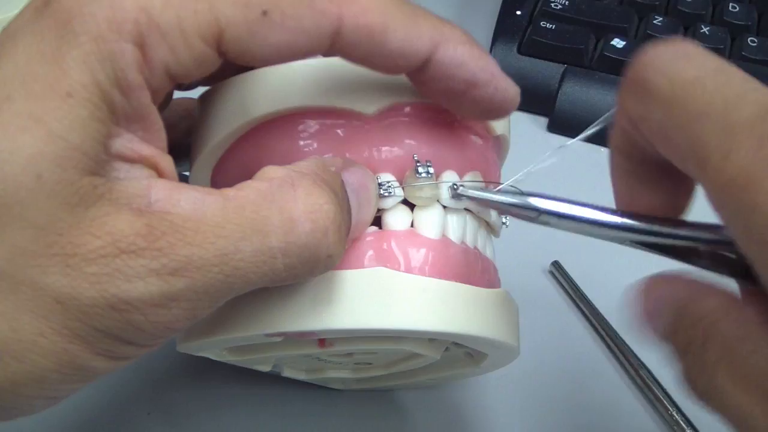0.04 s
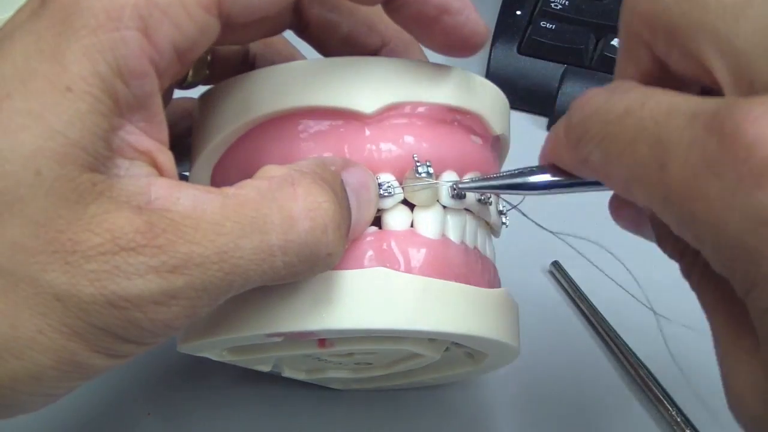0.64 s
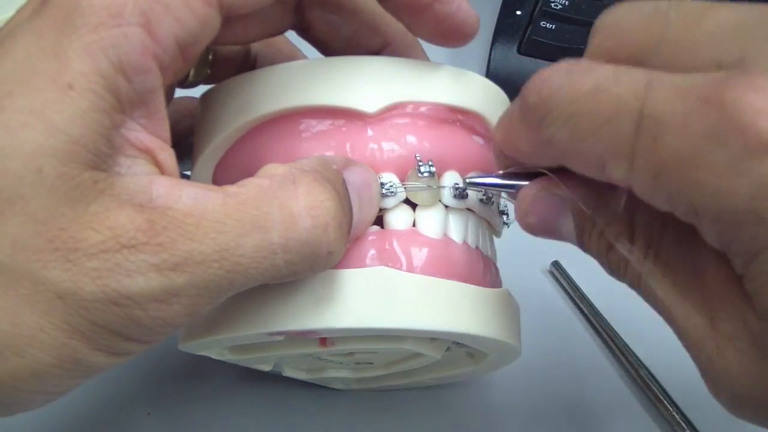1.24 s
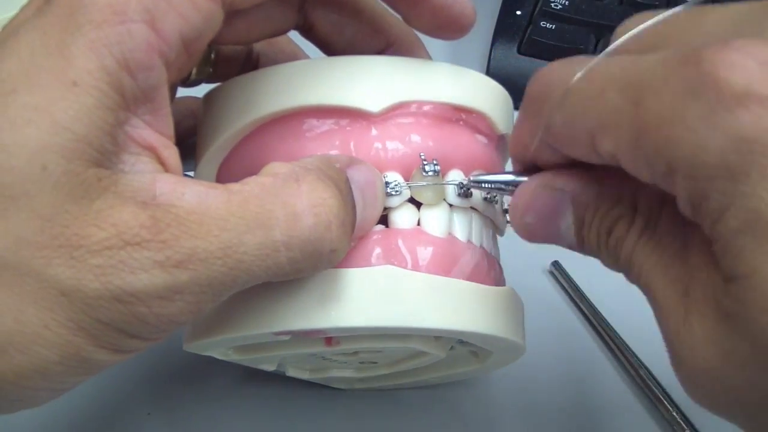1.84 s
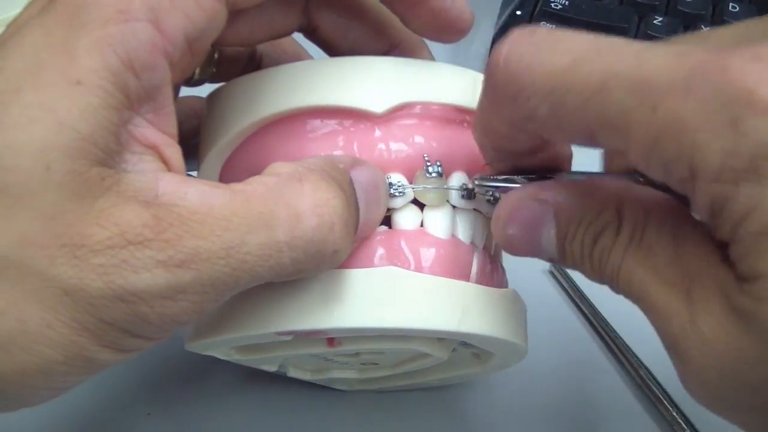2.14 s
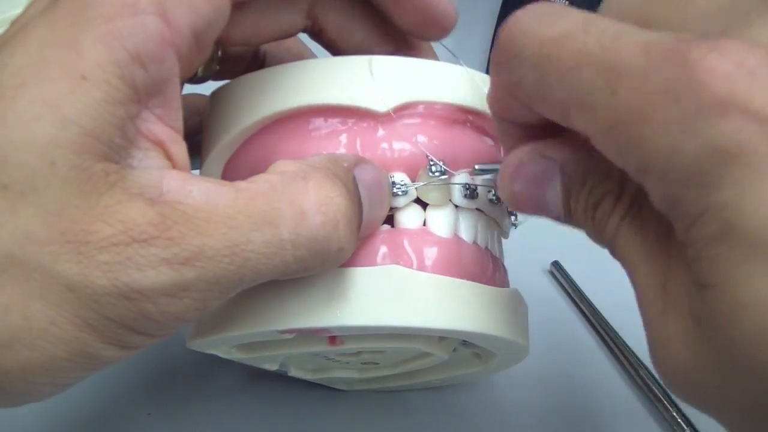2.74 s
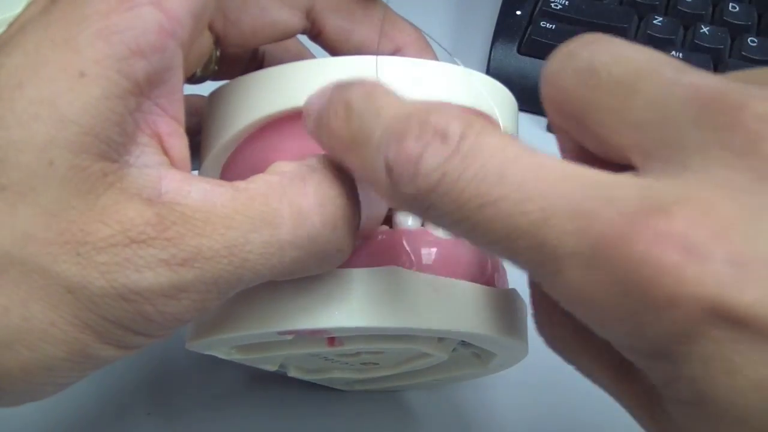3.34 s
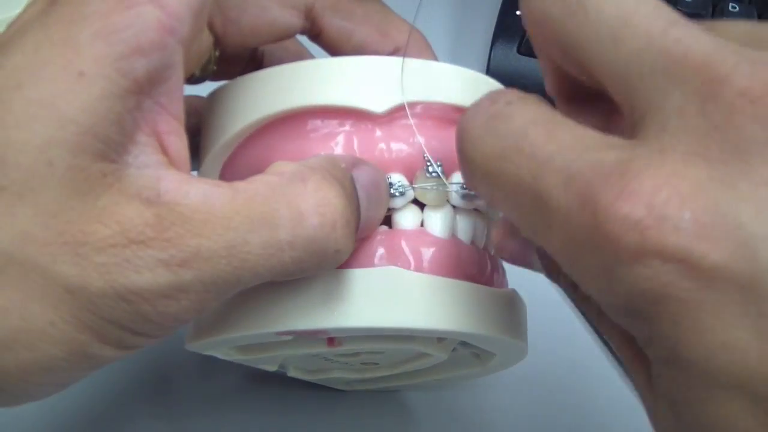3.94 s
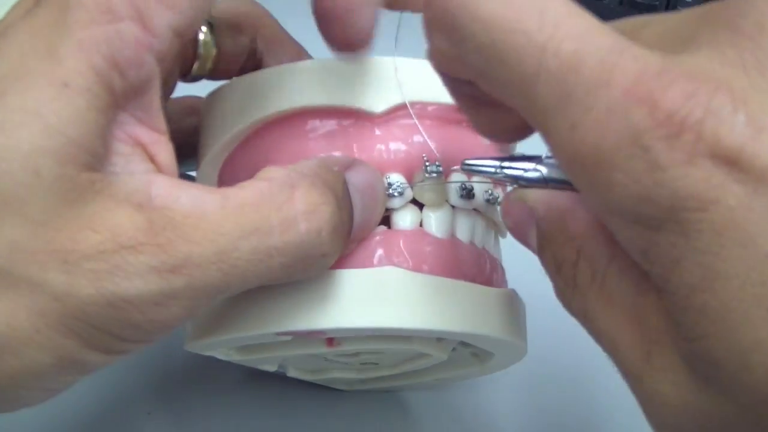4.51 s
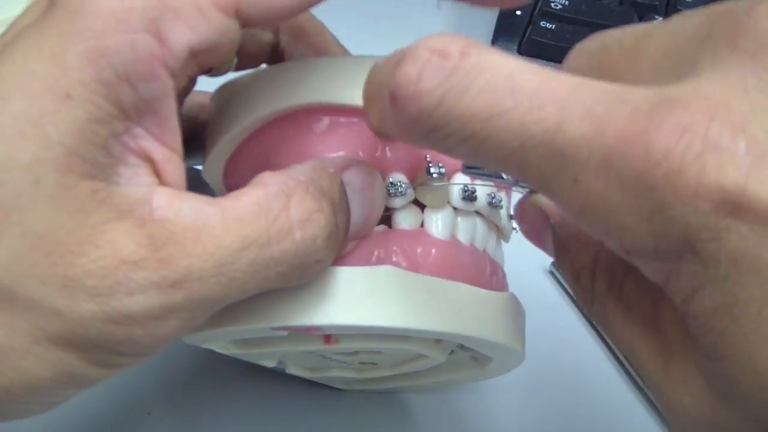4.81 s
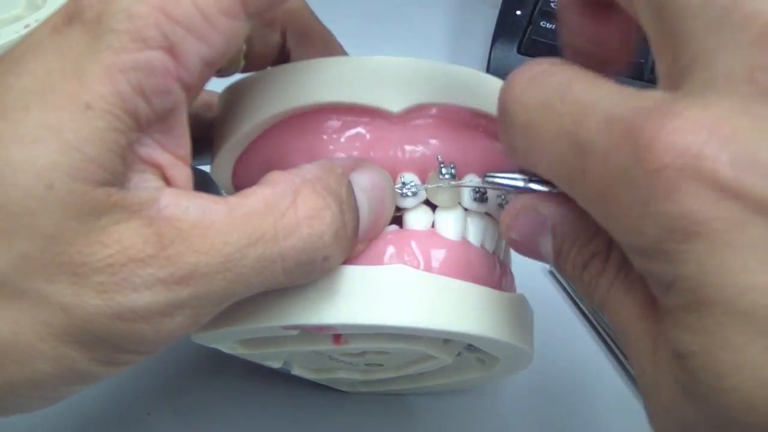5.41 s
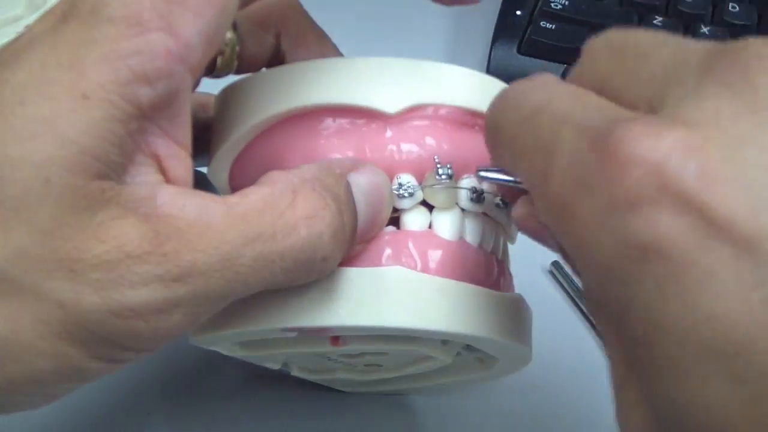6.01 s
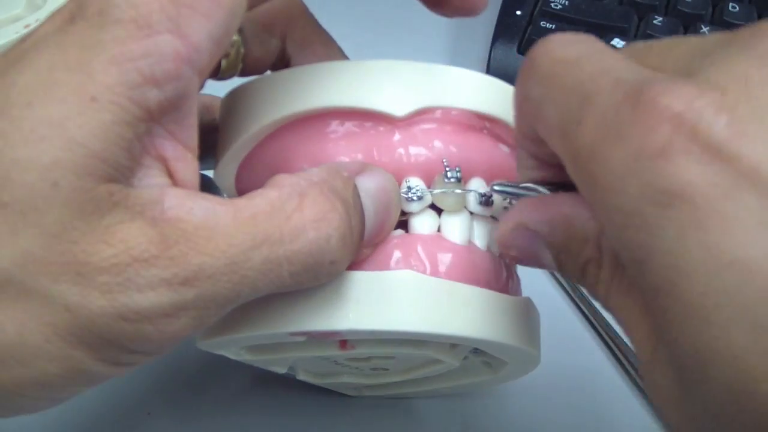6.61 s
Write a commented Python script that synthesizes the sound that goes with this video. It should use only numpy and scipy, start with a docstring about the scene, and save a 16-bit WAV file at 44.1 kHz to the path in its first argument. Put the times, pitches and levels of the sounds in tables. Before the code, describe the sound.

Faint scattered ticks and scrapes of fine wire being tightened onto a dental model's braces, under a room's electrical hum and fan noise.

```python
"""A small office, a camera's stereo microphone close to a plastic dental model; mains hum and fans throughout.
Pliers twist a thin steel ligature wire onto the brackets: it drags in fine stick-slip and rings, loose at first.
After half a second the grip changes and the wire, now tight, snaps over edges and squeaks; the model knocks
now and then. From 3 s the wire is tucked in, with a new ring and sparser strokes, up to a last cluster of snaps."""
import sys
import numpy as np
from scipy import signal
from scipy.fft import rfft, irfft, next_fast_len
from scipy.io import wavfile
from scipy.ndimage import map_coordinates

SR = 44100
rng = np.random.default_rng(int(sys.argv[2]) if len(sys.argv) > 2 else 0)


def output_pcm(signal):
    """Save a mono or channel-first signal as 16-bit PCM at the path in sys.argv[1].

    Samples are clipped to [-1, 1] before scaling.
    """
    pcm = np.clip(np.atleast_2d(signal).T, -1, 1) * 32767
    wavfile.write(sys.argv[1], SR, np.round(pcm).astype(np.int16))


N = 293706
TOP_HZ = 15900  # the microphone's band limit


def amp(db):
    """Decibels to gain."""
    return 10 ** (np.asarray(db) / 20)


def unit(x):
    """Scale to rms 1."""
    return x / np.sqrt(np.mean(x ** 2) + 1e-20)


def along(points, hz):
    """Interpolate (Hz, value) points on a log frequency axis."""
    f, v = np.transpose(points)
    return np.interp(np.log(hz + 1), np.log(f + 1), v)


def clock():
    """Time of each sample in seconds."""
    return np.arange(N) / SR


def wobble(rate):
    """A smooth random curve, rate knots a second."""
    return map_coordinates(rng.standard_normal(int(N * rate / SR) + 4), [clock() * rate])


def swell(t, rise_s, fall_s):
    """An envelope that builds up to 1 at t = 0 and dies away."""
    return np.exp(-abs(t / np.where(t < 0, rise_s, fall_s)))


def filtered(x, response):
    """Pass x through a response given as a function of Hz."""
    size = next_fast_len(x.shape[-1] + 8192)
    return irfft(rfft(x, size) * response(np.fft.rfftfreq(size, 1 / SR)), size)[..., :x.shape[-1]]


def rush(spectrum):
    """Stereo noise of rms 1, nearly alike at both microphone ports in the bass."""
    # Each row: frequency in Hz, left-right correlation.
    likeness = [(100, .997), (380, .99), (700, .94), (1400, .89), (2800, .62), (6000, .33), (14000, .25)]
    def response(hz):
        angle = np.arccos(np.clip(along(likeness, hz), -1, 1)) / 2
        return amp(along(spectrum, hz)) * [np.cos(angle), np.sin(angle)]
    mid, side = filtered(rng.standard_normal((2, N)), response)
    return unit(np.array([mid + side, mid - side]))


def tone(hz, db, drift_rad):
    """A sine of the given rms level whose phase wanders slowly."""
    phase = 2 * np.pi * (hz * clock() + rng.random()) + drift_rad * wobble(1.974)
    return np.sqrt(2) * amp(db) * np.sin(phase)


def office():
    """Room tone: steady mains hum, slightly unsteady fans, their air noise, a thin whine and hiss."""
    # Mains harmonics. Each row: multiple of the mains frequency, level in dB.
    harmonics = [(2, -22.5), (4, -43.5), (6, -46.5), (8, -48.5), (10, -54.5)]
    # Fan and drive tones, then electronic whine. Each row: frequency in Hz, level in dB.
    fan_tones = [(40.7, -34.5), (97, -49), (108.5, -51), (131.3, -41), (138.2, -39), (168.9, -45.5),
                 (193.7, -43), (259.4, -43.5), (307.3, -51), (362, -46.5), (382.2, -39.5), (395.8, -45.5),
                 (402.7, -42), (477.9, -54.5), (529.1, -54)]
    whine_tones = [(1001, -59.5), (3209, -69.5), (8091, -82)]
    # Fan air, then microphone hiss. Each row: frequency in Hz, relative spectral density in dB.
    air = [(8, -22), (20, -2.5), (38, 2.5), (60, -3), (130, -5.5), (195, -9), (218, -15), (260, -8),
           (330, -12), (395, -10), (430, -16.5), (650, -24), (1000, -33.5), (2000, -66)]
    hiss = [(300, -12), (700, -5), (1050, 0.5), (1700, -7), (2600, -12.5), (3400, -13.5), (5000, -19.5),
            (7400, -20), (8100, -17.5), (8900, -21), (15500, -24)]
    mains_hz = 59.97
    hum = sum(tone(round(k) * mains_hz, db, drift_rad=0.018) for k, db in harmonics)
    fans = sum(tone(hz, db, drift_rad=0.53) for hz, db in fan_tones)
    whine = sum(tone(hz, db, drift_rad=0.21) for hz, db in whine_tones)
    return hum + fans + whine + amp(-28.0) * rush(air) + amp(-42.5) * rush(hiss)


def echoes(x, t60, delay_s):
    """Sound scattered by the hands, the desk or the walls, different at each microphone port."""
    t = np.arange(SR // 4) / SR
    tail = rng.standard_normal((2, len(t))) * amp(-60 * t / t60) * (t > delay_s)
    return signal.fftconvolve(x[None], tail / np.linalg.norm(tail[0]), axes=1)[:, :N]


def model_knocks():
    """A bump rings the plastic jaw briefly; harder contact favours its upper modes."""
    # Each row: start in seconds, relative level in dB, hardness in dB per octave.
    bumps = [(1.474, -40, 1), (2.38, -41, -1), (2.55, -32, 2), (2.797, -43, 7), (3.347, -32, -11),
             (3.833, -41, 0), (6.53, -45, 1)]
    # Modes of the plastic. Each row: frequency in Hz, relative level in dB, t60 in seconds.
    modes = [(750, 0.5, 0.067), (1014, 4.5, 0.062), (1680, -4.5, 0.092), (2230, -2.5, 0.048),
             (2500, -12, 0.071), (3400, -16, 0.031)]
    out, t = np.zeros(N + SR), np.arange(SR // 4) / SR
    attack = 1 - np.exp(-t / 0.0002)
    for start, db, hardness in bumps:
        ring = np.zeros(len(t))
        for hz, mode_db, t60 in modes:
            decay = amp(mode_db + hardness * np.log2(hz / 1000) - 60 * t / t60)
            ring += decay * np.sin(2 * np.pi * (hz * t + rng.random()))
        out[round(start * SR):][:len(t)] += amp(db) * ring * attack
    return out[:N]


def pressure():
    """How hard the wire is dragged over steel and fingers: strokes add power to a faint resting rub."""
    # Pulls and turns. Each row: peak time in seconds, relative level in dB, decay time in seconds.
    strokes = [(0.229, -38, 0.032), (.345, -49, .024), (0.41, -49, 0.028), (0.618, -51, .03),
               (.785, -49, 0.04), (0.963, -45, 0.019), (1.125, -46.5, .03), (1.21, -36.5, 0.014),
               (1.267, -46.5, 0.027), (1.371, -43, .014), (1.46, -43, .035), (1.573, -44, 0.025),
               (1.645, -45.5, .026), (1.712, -45, 0.033), (1.821, -45, .027), (1.888, -44, .018),
               (2.052, -40, .026), (2.263, -38, .022), (2.303, -40, .012), (2.384, -36, .008),
               (2.506, -40.5, .022), (2.553, -30, .016), (2.66, -51, 0.044), (2.757, -46, 0.018),
               (2.82, -39, .009), (2.868, -45.5, .022), (2.936, -41.5, 0.018), (3.351, -44, .005),
               (3.65, -53, .055), (3.796, -39.5, .014), (3.836, -38, .008), (3.863, -34, .009),
               (4.32, -56, .045), (4.885, -52, .028), (5.012, -51, .022), (5.188, -50, .018),
               (5.434, -47, 0.019), (5.55, -49, .011), (5.655, -52, .015), (5.91, -50, .024),
               (5.982, -46, .032), (6.1, -45.5, .035), (6.188, -47, 0.042), (6.32, -55, .028),
               (6.467, -46, .015), (6.592, -49, 0.023)]
    t, resting_db = clock(), -65
    power = sum((amp(db) * swell(t - peak, 1.28 * fall_s, fall_s)) ** 2 for peak, db, fall_s in strokes)
    return np.sqrt(power + amp(resting_db) ** 2)


def drag(catches_per_s, catch_share, flutter_db):
    """Sliding wire: fine friction with tiny catches, its pressure fluttering."""
    catches = (rng.random(N) < catches_per_s / SR) * rng.standard_normal(N)
    friction = np.sqrt(catch_share) * unit(catches) + np.sqrt(1 - catch_share) * rng.standard_normal(N)
    return pressure() * unit(friction * amp(flutter_db * wobble(160)))


def travelling_contact(x, depth_db, span_hz, span_s):
    """The contact point travels along the wire, so that ever different overtones stand out."""
    hz, t, spectra = signal.stft(x, SR, nperseg=256)
    knots = rng.standard_normal((256, 1024))
    field = map_coordinates(knots, np.meshgrid(hz / span_hz, t / span_s, indexing="ij"), mode="wrap")
    gain = amp(depth_db * np.clip(field, -2, 2))
    gain /= np.sqrt(np.mean(gain[hz < TOP_HZ] ** 2, axis=0))
    return signal.istft(spectra * gain, SR, nperseg=256)[1][:N]


def slips(rise, fall, pivot_hz):
    """The wire slips over an edge or the jaws meet: a burst of friction, over within milliseconds."""
    # Each row: peak time in seconds, relative level in dB, brightness in dB per octave.
    snaps = [(.767, -32, 5), (.777, -41, -1), (1.205, -33, 1), (1.214, -35, 0), (1.302, -42, 6),
             (1.425, -35, 2), (1.458, -39, 1), (1.4747, -27, -5.5), (1.481, -34, -4), (1.554, -44, 6),
             (1.632, -33, 16), (1.7127, -39, 15), (1.893, -38, -5), (1.9376, -43, 6), (2.062, -29, 8),
             (2.2637, -32, 7), (2.38, -34, 1), (2.389, -39, 3), (2.432, -39, -2), (2.532, -36, 6),
             (2.5504, -19, 4), (2.694, -35.5, 3), (2.7973, -24, -5), (2.819, -34, -1), (3.111, -24.5, -7),
             (3.348, -31, 0), (3.833, -30.5, 6), (3.862, -34, 5), (4.195, -49, 4), (4.513, -45, -5),
             (4.872, -32, -11), (5.553, -40, 2), (5.658, -39, 8), (6.088, -35, 3), (6.098, -43, -6),
             (6.232, -33.5, -2), (6.254, -47, 4), (6.4555, -30, 5), (6.465, -24, -2), (6.4851, -20.5, -14),
             (6.4854, -22, 8)]
    force, t = np.zeros(N + SR), np.arange(-1024, 2048) / SR
    for peak, db, brightness in snaps:
        length = .0011 * .5 ** ((db + 33.5) / 13)  # 13 dB harder, half as long
        tilt = lambda f: amp(brightness * np.log2(np.clip(f, pivot_hz / 2, TOP_HZ) / pivot_hz))
        burst = unit(filtered(rng.standard_normal(len(t)), lambda f: tilt(f) * (f < TOP_HZ)))
        envelope = amp(db) * swell(t, rise * length, fall * length)
        force[round((peak + t[0]) * SR):][:len(t)] += envelope * burst
    return force[:N]


def squeaks(width_hz, rise, fall):
    """The wire catches and sings briefly on one rough resonance."""
    # Each row: peak time in seconds, pitch in Hz, relative level in dB.
    catches = [(.222, 8200, -50), (.226, 7240, -52), (.352, 9710, -50), (.427, 9700, -50),
               (.613, 4430, -50), (.77, 5100, -41), (.976, 4520, -45), (1.146, 8750, -40),
               (1.225, 5100, -43), (1.425, 6360, -37), (1.462, 6300, -42), (1.498, 7280, -41),
               (1.557, 4980, -41), (1.559, 5970, -43), (2.03, 10000, -44), (2.291, 7500, -39),
               (2.381, 7040, -34), (2.551, 4480, -38), (2.576, 5000, -41), (2.822, 5060, -33),
               (3.346, 2650, -39), (3.834, 9600, -36), (3.862, 9900, -32), (5.015, 14200, -49),
               (5.19, 14400, -45), (5.45, 9720, -48), (6.102, 6530, -41), (6.467, 12100, -38),
               (6.485, 3140, -38), (6.485, 4200, -35), (6.487, 12020, -39), (6.599, 9400, -45)]
    out, t = np.zeros(N + SR), np.arange(-2048, 4096) / SR
    for peak, hz, db in catches:
        length = .0037 * .5 ** ((db + 40.5) / 8)  # 8 dB harder, half as long
        # uneven friction makes the phase stray and widens the line
        stray = np.cumsum(rng.standard_normal(len(t))) * np.sqrt(2 * np.pi * width_hz / SR)
        envelope = amp(db) * swell(t, rise * length, fall * length)
        out[round((peak + t[0]) * SR):][:len(t)] += envelope * np.sin(2 * np.pi * hz * t + stray)
    return out[:N]


def ringing(force, modes, direct):
    """Contact force heard directly and through the wire's resonances, at a mean power gain of 1."""
    # Colour of steel rubbing on steel. Each row: frequency in Hz, relative gain in dB.
    rub = [(600, -28), (2000, -7), (3500, -0.5), (5000, -2.5), (8000, 2), (12000, 1), (15500, -5.5)]
    def response(f):
        ring = sum(amp(db) * 1j * f * width / (hz * hz - f * f + 1j * f * width)
                   for hz, width, db in modes)
        gain = (direct + ring) * amp(along(rub, f))
        return gain / np.sqrt(np.mean(abs(gain[f < TOP_HZ]) ** 2))
    return filtered(force, response)


def wire():
    """Drag and slips ring the wire, whose resonances change as it is wound tight and tucked in."""
    # The wire's resonances in each grip. Each row: frequency in Hz, width in Hz, relative gain in dB.
    loose_modes = [(3600, 400, -12), (7240, 100, -3.5), (8440, 200, -2), (9700, 74, -7), (11200, 140, -6),
                   (11950, 260, 0), (13800, 150, -3), (14400, 250, 3)]
    tight_modes = [(5060, 130, -6.5), (5930, 140, -11), (7050, 420, -13), (8380, 540, -13),
                   (9600, 400, -11.5), (10980, 260, -9), (11700, 190, -9), (12400, 120, -15),
                   (13300, 120, -9), (14100, 660, -3), (14700, 180, -3)]
    tucked_modes = [(6750, 400, -5), (8140, 230, -16), (9700, 410, -9), (12040, 180, 3), (14400, 450, 5.5),
                    (15500, 200, -6)]
    # Times in seconds at which the pliers change their hold.
    regrips = [.47, 3.0]
    sliding = drag(catches_per_s=450, catch_share=0.27, flutter_db=2.5)
    sliding = travelling_contact(sliding, depth_db=4, span_hz=420, span_s=.03)
    force = amp(2.5) * sliding + amp(1.5) * slips(rise=0.81, fall=1.7, pivot_hz=7250)
    grip = np.digitize(clock(), regrips)
    loose = ringing(force * (grip == 0), loose_modes, direct=0.12)
    tight = ringing(force * (grip == 1), tight_modes, direct=0.31)
    tucked = ringing(force * (grip == 2), tucked_modes, direct=1.0)
    return loose + tight + tucked + amp(2.5) * squeaks(width_hz=127, rise=0.86, fall=1.8)


def scene():
    """The handwork at close range, its near echoes and a faint tail from the walls, over the room tone."""
    work = wire() + model_knocks()
    hands = amp(-9) * echoes(work, t60=.004, delay_s=.0001)
    desk = amp(-8.5) * echoes(work, t60=0.056, delay_s=0.0009)
    walls = amp(-18) * echoes(work, t60=0.22, delay_s=0.0061)
    return amp(-0.62) * (work + hands + desk + walls) + office()


def record(dry):
    """The camera's band-limited microphone: in the bass its left port is weaker and leads in phase."""
    # Port balance. Each row: frequency in Hz, left minus right in dB.
    balance = [(30, -4.2), (80, -2.3), (125, -2.0), (300, -.4), (700, 0)]
    # Port phase. Each row: frequency in Hz, lead of the left port in radians.
    lead = [(30, .26), (120, .25), (200, .19), (380, .1), (1400, .03), (2800, 0)]
    half = np.array([[.5], [-.5]])  # each port takes half, in opposite directions
    ports = filtered(dry, lambda hz: amp(half * along(balance, hz)) * np.exp(1j * half * along(lead, hz)))
    return filtered(ports, lambda hz: hz < TOP_HZ)


dry = scene()
out = record(dry)
output_pcm(out)
```